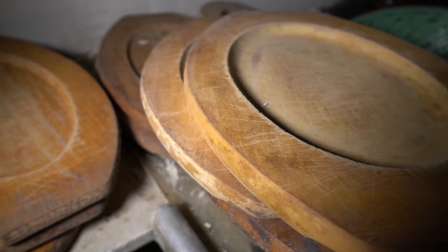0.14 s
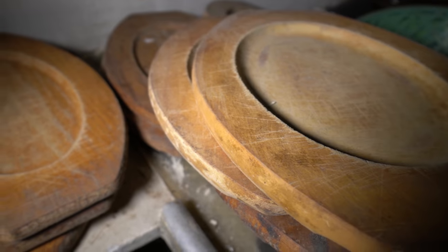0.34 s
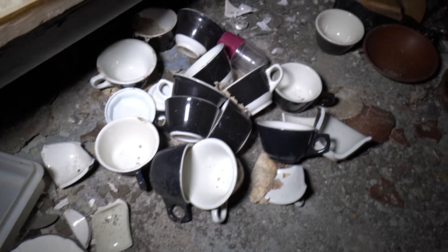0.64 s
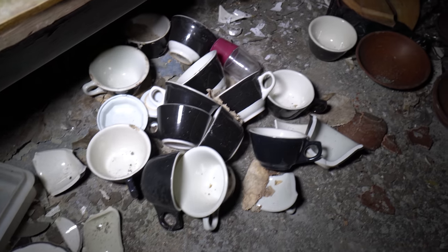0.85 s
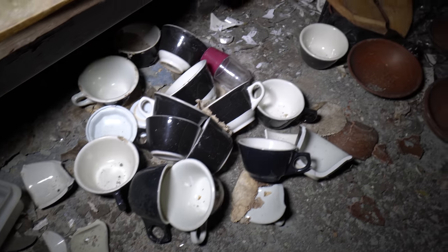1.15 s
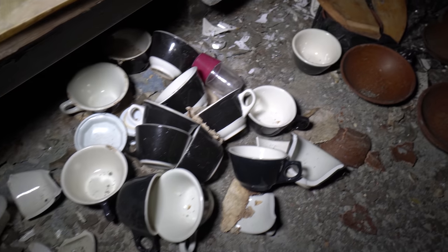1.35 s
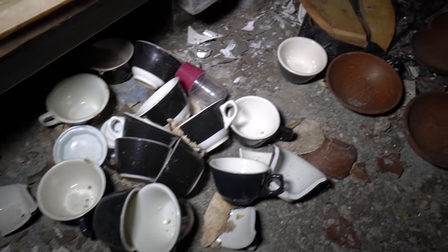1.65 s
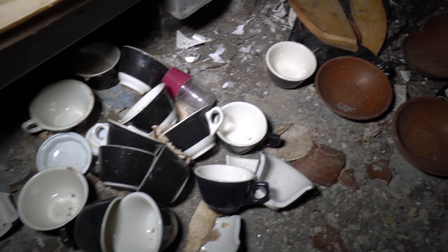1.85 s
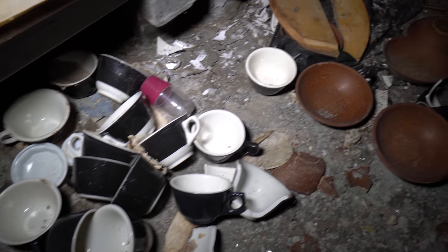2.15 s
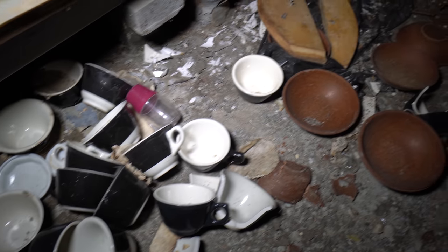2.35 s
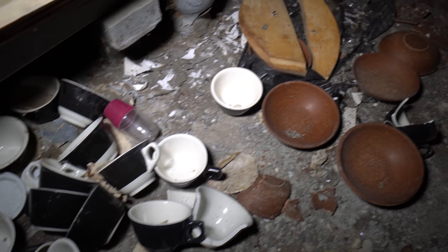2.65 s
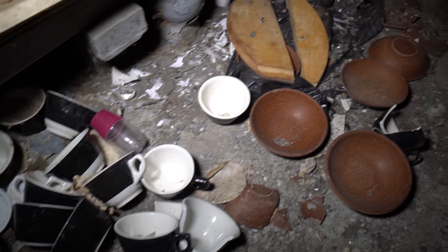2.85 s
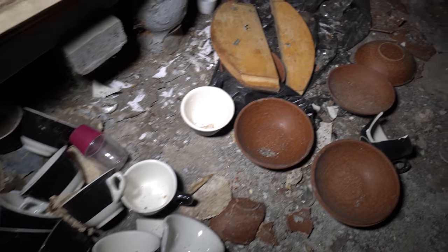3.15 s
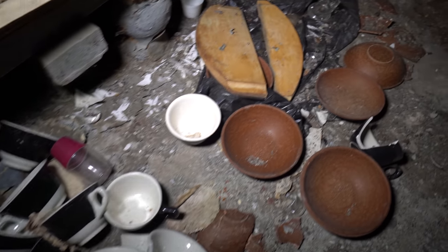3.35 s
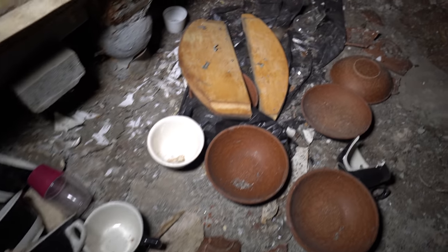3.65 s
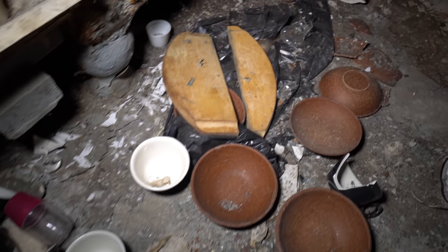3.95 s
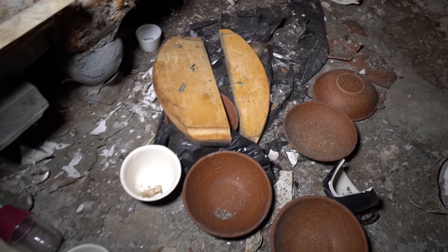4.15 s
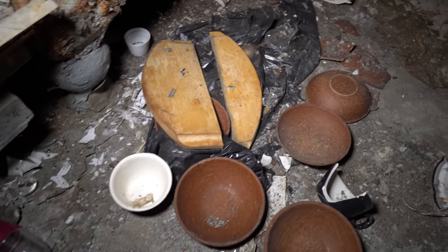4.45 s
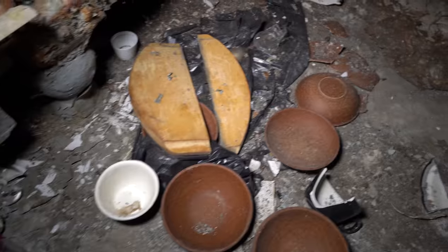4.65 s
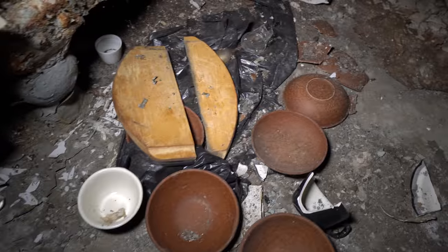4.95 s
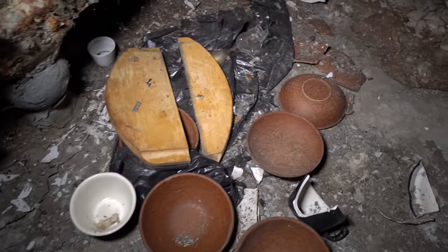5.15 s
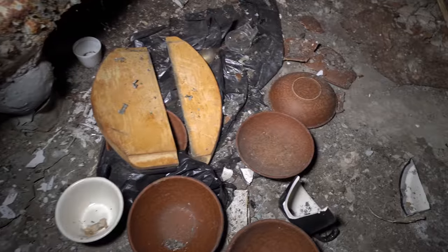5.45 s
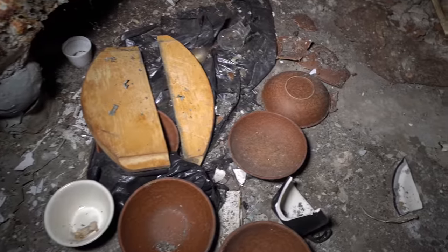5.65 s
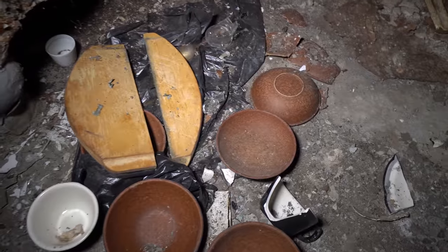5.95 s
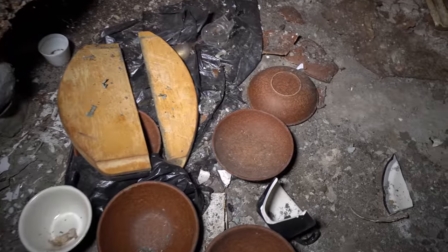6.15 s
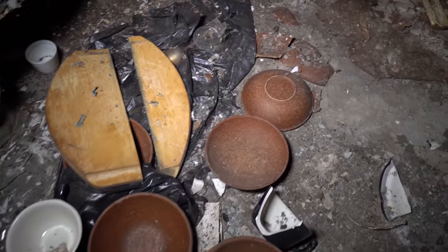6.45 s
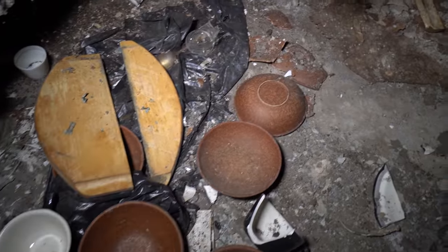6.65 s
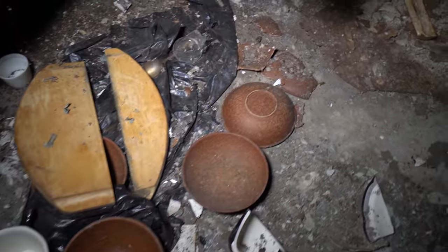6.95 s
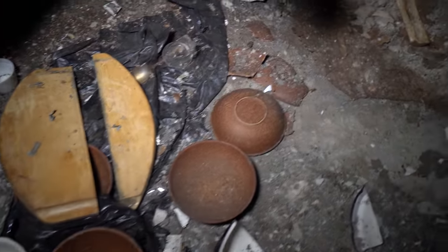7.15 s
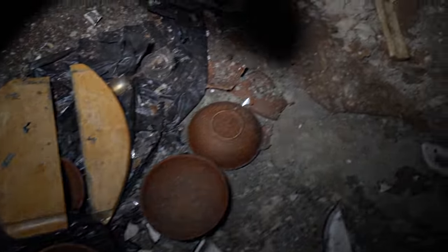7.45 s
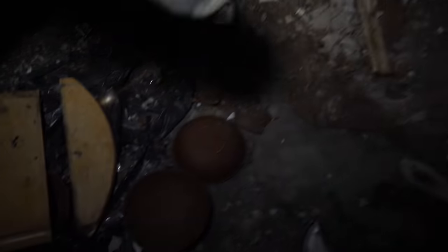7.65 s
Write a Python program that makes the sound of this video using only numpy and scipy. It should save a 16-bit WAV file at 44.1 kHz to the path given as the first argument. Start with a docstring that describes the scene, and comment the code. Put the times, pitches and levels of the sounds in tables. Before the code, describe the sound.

Shoes shift slowly over broken crockery and grit in a small bare room, shards snapping and clicking above a low handling rumble.

```python
"""Shoes shift slowly over grit and broken crockery in a small bare room, close to a hand-held microphone.
Shards crack and click: each is a sharp snap, then splinters and fizz. Soles scuff: noise and tiny grains.
A foot lands as a dull thud. Rubbed metal, a dragged shard and a faint hum are modes kept ringing by contacts.
Regular slips creak near the end. Under it all lie a deep, swelling rumble from handling and a quiet room tone."""
import sys
import numpy as np
from scipy import signal
from scipy.fft import rfft, irfft, next_fast_len
from scipy.io import wavfile
from scipy.ndimage import uniform_filter1d

SR = 44100
rng = np.random.default_rng(int(sys.argv[2]) if len(sys.argv) > 2 else 0)


def store_wav(level_fs):
    """Save 16-bit WAV to argv[1]."""
    pcm = np.round(np.clip(np.atleast_2d(level_fs), -1, 1) * 32767)
    wavfile.write(sys.argv[1], SR, pcm.T.astype(np.int16))


N = 344421  # length in samples


def amp(db):
    """Turns decibels into a gain."""
    return 10 ** (np.asarray(db) / 20)


def evened(x):
    """Scales a signal to an rms of 1."""
    return x / np.sqrt(np.mean(x ** 2) + 1e-20)


def smoothed_twice(x, size):
    """Turns noise into a slow wander with an rms of 1, by averaging neighbours twice."""
    return evened(uniform_filter1d(uniform_filter1d(x, size=size), size=size))


def read(points, hz):
    """Reads a table of values over pitch, along a log-frequency axis."""
    f, value = np.transpose(points)
    return np.interp(np.log(hz + 1), np.log(f + 1), value)


def curves(rows):
    """Draws each column of a timed table as a curve, sample by sample."""
    s, *columns = np.transpose(rows)
    return [np.interp(np.arange(N) / SR, s, column) for column in columns]


def inside(rows):
    """Is 1 while a timed table lasts and 0 elsewhere, with soft ends."""
    t = np.arange(N) / SR
    lasts = (t >= rows[0][0]) & (t <= rows[-1][0])
    return uniform_filter1d(1. * lasts, size=300)


def colour(x, db):
    """Filters without any pre-echo: the phase follows from the log gain (minimum phase)."""
    cepstrum = irfft(np.log(amp(np.maximum(db, -100))))
    half = cepstrum.shape[-1] // 2
    # fold the backward half of the cepstrum onto the forward half
    folded = [cepstrum[..., :1], 2 * cepstrum[..., 1:half], 0 * cepstrum[..., half:]]
    response = irfft(np.exp(rfft(np.concatenate(folded, -1))))
    return signal.oaconvolve(x, response, axes=-1)[..., :x.shape[-1]]


def shaped(points):
    """Makes steady noise of a given spectrum, with an rms of 1."""
    gain = amp(read(points, np.fft.rfftfreq(N, 1 / SR)))
    return evened(irfft(rfft(rng.standard_normal(N)) * gain, N))


def ring(x, hz, width):
    """Rings one mode, width in Hz, with about unit gain at its centre."""
    pole = np.exp((2j * np.pi * hz - np.pi * width) / SR)
    return 2 * signal.lfilter([1 - abs(pole)], [1, -pole], x).real


def add(mix, s, sound):
    """Mixes a sound in at a time in seconds."""
    part = mix[round(s * SR):][:len(sound)]
    part += sound[:len(part)]


def rumble():
    """Handling shakes the microphone: lumpy noise, flattened in level, then swelling at random."""
    # Base level of the shake. Each row: time in seconds, level in dB before the random swell.
    shake_level = [(0.0, -29), (0.08, -29), (1.0, -25.5), (1.02, -39.5), (1.32, -19), (1.85, -40.5),
                   (1.98, -27.5), (2.17, -40), (2.26, -25), (2.41, -38.5), (2.48, -28), (3.04, -35),
                   (3.28, -21), (5.02, -30), (5.15, -36), (5.2, -28), (5.79, -24), (5.85, -40.5),
                   (6.24, -17.5), (6.33, -31.5), (6.79, -26), (6.81, -33), (7.39, -22), (7.81, -24)]
    # Colour of the shake. Each row: frequency in Hz, relative level in dB per Hz.
    shake_colour = [(2, -22), (6, -9), (15, -8), (21, 0), (25, -10), (30, -16), (37, -16), (42, -26),
                    (50, -50), (80, -90)]
    swell_db, swell_s = 3, .06
    shake = signal.hilbert(shaped(shake_colour), next_fast_len(N))[:N]
    # dividing by its own envelope makes the shake steadier
    steady = evened((shake / (abs(shake) + 0.36)).real)
    swell = smoothed_twice(rng.standard_normal(N), round(swell_s * SR))
    moving = amp(curves(shake_level)[0] + swell_db * swell) * steady
    low_pass = signal.butter(7, 41, fs=SR, output="sos")
    return signal.sosfiltfilt(low_pass, moving)


def unshared_bass():
    """Steady noise, mostly bass, that the two channels will take with opposite signs."""
    # Each row: frequency in Hz, relative level in dB per Hz.
    bass_colour = [(2, -8), (7, 0), (15, -6), (21, -2), (27, -16), (36, -19), (45, -33), (70, -33),
                   (110, -41), (140, -46), (200, -57), (400, -68), (800, -78), (2500, -92), (16000, -93)]
    return amp(-44.5) * shaped(bass_colour)


def room_tone():
    """The quiet steady noise of the room, given its colour by a spectrum."""
    # Each row: frequency in Hz, relative level in dB per Hz.
    tone_colour = [(35, -28), (47, 4), (60, -2), (90, -12), (150, -11.5), (260, -16), (420, -16.5),
                   (600, -16.5), (1500, -19), (4300, -23.5), (7000, -33.5), (16000, -42)]
    return amp(-59) * shaped(tone_colour)


def slides():
    """Gains of slide, hiss and weight as a sole slides on grit: each slide rises, holds and dies away."""
    # Each row: time in seconds when the slide reaches full level, after its rise, held time in seconds,
    # level in dB (scuff() later lowers all by 3.5 dB), treble hiss in dB, low weight in dB;
    # hiss and weight are relative to the slide.
    slide_rows = [(0, .03, -47, -12, 3.5), (.2, .04, -52, 3.5, -10.5), (.3, .14, -59, -3, -10),
                  (.56, .04, -51, 2.5, -3.5), (.75, .21, -53, -2, -2), (1.0, 0.12, -51.5, -6, -6),
                  (1.14, .05, -44, -15, -13), (1.26, .15, -51.5, -8, -9), (1.45, .09, -50, -5, -6),
                  (1.88, .1, -39, -23, 0), (2.12, .08, -59, -16, 3), (2.32, .04, -49, -14, -15),
                  (2.44, .2, -51, -15, -10), (2.7, .23, -47, -8, -4), (3.02, .09, -47.5, -12, -3),
                  (3.19, .18, -41.5, -10, -14), (3.4, .07, -48, -7, -14), (3.49, .03, -39, -7, -14),
                  (3.62, .26, -49, -8, -7), (4.0, .1, -52, -17, -13), (4.48, .05, -44, -20, -7),
                  (4.6, 0.17, -55, -5, -7.5), (4.88, 0.046, -62, -3, -2), (4.949, 0.13, -54.5, -8, -1.5),
                  (5.23, .11, -52.5, -8.5, -6.5), (5.42, .12, -56.5, -8.5, -3), (5.59, .05, -50, -7.5, 4.5),
                  (5.75, .26, -56, -11.5, -5.5), (6.04, .03, -51, -11, -6), (6.131, .09, -57.5, -20, -1),
                  (6.33, .1, -53, -10, -0.5), (6.499, 0.18, -48, -7.5, -4), (6.7, .19, -42, -11, -3),
                  (6.929, .25, -48.5, -9, -1), (7.24, .07, -57, -5, -3), (7.36, 0.018, -45, -21, -7),
                  (7.45, .13, -55, -8, 3), (7.65, .02, -50, -14, -6), (7.78, .03, -54, -5, 2)]
    rise_db_per_s, fall_db_per_s = 240, 150
    s, held, db, hiss_db, weight_db = np.transpose(slide_rows)[:, :, None]
    t = np.arange(0, N + 64, 64) / SR  # a coarse clock is enough
    before, after = np.maximum(s - t, 0), np.maximum(t - s - held, 0)
    shape_db = db - rise_db_per_s * before - fall_db_per_s * after
    gains = []
    for extra_db in (0, hiss_db, weight_db):
        total = np.sqrt((amp(shape_db + extra_db) ** 2).sum(0))
        gains.append(np.interp(np.arange(N) / SR, t, total))
    return gains


def scuff(grains_per_s=900, spread_db=3.0, grain_share=0.42, flicker_db=3.0, level_db=-3.5):
    """A sole rubs on grit: flickering noise and many small grains, in three bands with their own gains."""
    # Colour of the grit. Each row: frequency in Hz, relative level in dB per Hz.
    grit_colour = [(88, -38.5), (150, -11.5), (368, -8.5), (745, -7), (854, -4), (1080, -4.5), (1600, 2.5),
                   (3350, -4.5), (4320, -4.5), (6260, -20), (16000, -36.5)]
    slide, hiss, weight = slides()
    hits = rng.random(N) < grains_per_s / SR
    sizes = amp(spread_db * np.minimum(rng.exponential(1, N), 4))
    grains = hits * sizes * rng.choice([-1., 1.], N)
    flicker = smoothed_twice(rng.standard_normal(N), 500)
    noise = rng.standard_normal(N) * amp(flicker_db * flicker)
    drive = grain_share * evened(grains) + np.sqrt(1 - grain_share ** 2) * noise
    grit = colour(drive, read(grit_colour, np.fft.rfftfreq(2048, 1 / SR)))
    low = signal.sosfilt(signal.butter(3, [150, 850], "band", fs=SR, output="sos"), grit)
    mid = signal.sosfilt(signal.butter(3, [850, 6500], "band", fs=SR, output="sos"), grit)
    high = signal.sosfilt(signal.butter(4, 6500, "high", fs=SR, output="sos"), grit)
    return amp(level_db) * (slide * evened(mid) + hiss * evened(high) + weight * evened(low))


def rubbed_mode(hz, t60, size, per_s=1500):
    """Small uneven contacts keep one mode of a hard thing ringing; the changing grip bends its pitch."""
    bend = .0012  # typical wander, as a share of the pitch
    n = size + 3000  # the mode is already swinging when it is heard
    contacts = (rng.random(n) < per_s / SR) * rng.standard_normal(n) * np.exp(2j * np.pi * rng.random(n))
    wide, narrow = np.exp(-np.pi * np.array([8, 2.2]) / t60 / SR)  # two poles smooth the swing
    swing = signal.lfilter([1], np.poly([wide, narrow]), contacts)
    grip = smoothed_twice(rng.standard_normal(n), 2500)
    turns = np.cumsum(hz * (1 + bend * grip)) / SR
    return evened((swing * np.exp(2j * np.pi * turns)).real[-size:])


def singing(modes_hz, spells, t60):
    """Rubbing keeps each mode ringing for some short spells; t60 in seconds sets how slowly it swings."""
    out = np.zeros(N)
    for hz, of_mode in zip(modes_hz, spells):
        for s, length, db in of_mode:
            force = amp(db) * signal.windows.tukey(round(length * SR) + 2, .6)
            add(out, s, force * rubbed_mode(hz, t60, size=len(force)))
    return out


def rubbed_metal():
    """A small metal piece sings on several modes as it is rubbed."""
    # The pitch of each mode in Hz.
    metal_hz = [3400, 3455, 5240, 5330, 7960, 10600, 12550, 15300]
    # One list of spells for each mode. Each spell: start in seconds, length in seconds, level in dB.
    metal_spells = [
        [(1.3, 0.037, -54), (4.528, 0.044, -46.5)],
        [(0, 0.063, -55), (.78, 0.057, -57), (1.25, .07, -54), (1.3, 0.064, -39.5), (1.335, 0.079, -42.5),
         (1.39, 0.12, -49), (4.525, 0.11, -46), (4.61, 0.1, -54)],
        [(1.3, 0.03, -45), (1.39, .05, -53), (4.535, 0.087, -49)],
        [(0, 0.05, -68), (1.29, 0.12, -45.5), (4.54, 0.07, -51), (4.6, 0.07, -57)],
        [(0, .04, -68), (1.305, 0.071, -52), (1.365, 0.052, -66), (4.545, .065, -69)],
        [(1.3, 0.076, -65), (4.55, .04, -78)],
        [(.81, 0.074, -72), (1.31, .06, -74)],
        [(.81, .09, -74), (1.3, .07, -74)],
    ]
    return singing(metal_hz, metal_spells, t60=0.06)


def thuds(rise_s=0.0026):
    """The weight of a foot: a fading push of noise sets off a dull, rough low ring."""
    # Each row: start in seconds, peak level in dB, pitch in Hz, time in seconds for the push to fall 60 dB.
    thud_rows = [(0.005, -37.5, 474, 0.11), (1.874, -37, 200, 0.12), (1.9, -47, 330, .12),
                 (2.119, -49, 140, 0.11), (3.223, -34, 151, 0.078), (3.288, -42, 420, 0.12),
                 (4.505, -51.5, 252, .08), (5.558, -46, 296, .06), (5.6, -36, 203, 0.026),
                 (6.272, -50, 303, 0.042), (6.502, -41.5, 280, 0.065), (6.751, -52, 178, 0.12),
                 (7.227, -48, 400, 0.069), (7.354, -41, 254, 0.091), (7.368, -43, 121, 0.057),
                 (7.77, -64, 300, .06)]
    out, t = np.zeros(N), np.arange(8192) / SR
    for s, db, hz, t60 in thud_rows:
        push = rng.standard_normal(len(t)) * (1 - np.exp(-t / rise_s)) * amp(-60 * t / t60)
        low = ring(ring(push, hz, .75 * hz), hz, .75 * hz)
        add(out, s, amp(db) * low / abs(low).max())
    return out


def chips(count=26):
    """Faint cracks under a moving sole, drawn at random: more and louder where it slides hard."""
    over_slide_db, middle_hz = 5, 1900
    colour_db = [-14, -1, -16, -22]  # body, bite, treble and fizz, as for the cracks
    scatter_db, scatter_octaves = 4, .3
    when, pitch, size, *colours = rng.standard_normal((count, 7)).T
    slide = slides()[0]
    # equal steps along this running share fall closer together in loud slides
    share = np.cumsum(np.sqrt(slide)) / np.sqrt(slide).sum()
    place = (np.arange(count) + .5 + .3 * when) / count
    at = np.searchsorted(share, np.clip(place, 0, .999))
    db = 20 * np.log10(slide[at]) + over_slide_db + scatter_db * size
    hz = middle_hz * 2 ** (scatter_octaves * pitch)
    return np.c_[at / SR, db, hz, colour_db + scatter_db * np.transpose(colours)]


def cracks(splinter_db=-9):
    """A shard snaps, splinters for some ms and fizzes out; each has its own pitch and colour."""
    # The clearest cracks. Each row: start in seconds, level of the loudest 3 ms in dB, ring pitch in Hz,
    # body under 1 kHz in dB, bite near 4 kHz in dB, treble in dB, fizz in dB; the last four are relative.
    crack_rows = [(.1792, -33.5, 2200, -15, 2, -18, -25), (.5614, -37, 2350, -7, -2, -14, -23),
                  (.6323, -38.5, 2340, -5, 0, -36, -25), (.8569, -33, 2360, -13, -4, -23, -25),
                  (.912, -30, 2350, -19, -4, -24, -21), (.9459, -37, 900, -10, 0, -18, -21),
                  (1.0639, -39.5, 2530, -8, 11, -4, -21), (1.2015, -22.5, 1465, -8, -3, -15, -24),
                  (1.2262, -21, 1520, -9, -10, -21, -31), (1.413, -42.5, 960, -8, -18, -37.5, -8),
                  (1.4703, -29, 1530, -11, -1, -16, -25), (1.5317, -31, 870, -12, -11, -15, -24),
                  (1.7104, -48, 1510, -16, -24, -26, -30), (1.75, -48, 1560, -18, -6, -22, -17),
                  (1.8664, -35.5, 2020, 0, -4, -26, -21), (1.894, -36, 2000, 8, -6, -18, -5),
                  (1.912, -38, 2500, -10, -3, -6, -8), (1.9801, -32, 1500, -9, -12, -24, -32),
                  (1.9987, -33.5, 2070, -19, -4, -11, -23), (2.0488, -37, 1800, -24, -9, -19, -25),
                  (2.19, -48, 2000, -16, -3, -12, -25), (2.273, -45, 1590, -15, -12, -7, -25),
                  (2.29, -44, 1600, -14, -27, -20, -21), (2.3168, -33.5, 2170, -17, 2, -12, -20),
                  (2.3589, -39, 1600, -14, -5, -17, -20), (2.3656, -37, 1630, -22, -7, -25, -25),
                  (2.3801, -35.5, 1610, -15, -10, -15, -19), (2.4095, -39.5, 2130, -17, -21, -26, -26),
                  (2.4187, -38, 1610, -22, -19, -26, -24), (2.4314, -36.5, 2070, -20, 2, -11, -17),
                  (2.4594, -39, 1600, -14, -12, -18, -22), (2.4799, -33, 1400, -6.5, -9, -32, -18),
                  (2.5076, -29, 1480, -6, -8.5, -25, -20), (2.5344, -37.5, 2120, -26, 0, -10, -19),
                  (2.5667, -37, 1590, -14, -12, -22, -19), (2.5937, -34.5, 1630, -10, -13, -27, -22),
                  (2.6274, -25, 1680, -27, -2.5, -30, -20), (2.6932, -17.5, 1550, -19, -3, -21, -15),
                  (2.7208, -35, 1790, -8, -14, -19, -13), (2.7338, -25.5, 2220, -11, 2, -15, -9),
                  (2.7924, -39, 1420, -16, -7, -18, -21), (2.802, -28.5, 2380, -27, -1, -23, -24),
                  (2.8432, -26.5, 1020, -5, 6.5, 4, -25), (2.8821, -35, 2240, -18, 7, -19, -19),
                  (2.8893, -24, 2250, -24, -7, -30, -24), (2.9146, -14.5, 1620, -21, -6.5, -20, -25),
                  (2.9426, -33.5, 1970, -19, -17, -13, -16), (3.0072, -31, 1070, -15, -1, -10, -20),
                  (3.0194, -27, 1060, -17, -4, -15, -5), (3.0299, -23.5, 1680, -9, -14, -25, -27),
                  (3.08, -27, 1094, -9.5, 8, -17, -15), (3.1525, -31, 1520, -4, -1, -6, -19),
                  (3.1927, -26, 3180, -14, 5.5, -7, -26), (3.2265, -28, 3200, 1, 5, -13, -18),
                  (3.238, -28, 3200, -5, 0, -11, -14), (3.2749, -29, 1500, 1, -14, -20, -8),
                  (3.2807, -20.5, 1360, -1, -26, -28, -24), (3.2946, -16, 1340, -10, -16, -18, -22),
                  (3.306, -22, 1380, -6, -8, -21, -17), (3.3158, -28, 3070, -24, 6, -16, -13),
                  (3.3524, -25.5, 3200, -34, 3, -4, -17), (3.4045, -37.5, 1670, -18, -16, 3, -17),
                  (3.424, -37, 2610, -10, -5, -12, -18), (3.4357, -31, 2540, -17, -8, -3, -13),
                  (3.4493, -30.5, 1810, -5, -3, -14, -18), (3.4639, -36, 1870, -12, 7, -18, -21),
                  (3.4829, -18.5, 2410, -6.5, 1.5, -9, -18), (3.5395, -37, 1770, -17, -15, -21, -21),
                  (3.5627, -36, 1780, -21, 5, -9, -16), (3.5717, -34.5, 1940, -20, -5, -14, -18),
                  (3.6009, -35, 1290, -10, -14, 1, -18), (3.6307, -19.5, 1880, -13, -7.5, -7, -18),
                  (3.6424, -20, 1280, -4, -1, -7, -27), (3.6908, -31, 1720, -10, -20, -9, -24),
                  (3.7246, -30, 1280, -6, -26, -11, -20), (3.7316, -29.5, 1660, -8, 10, -9, -23),
                  (3.7643, -30.5, 1810, -18, -6, -26, -20), (3.7871, -34.5, 1790, -14, -11, -30, -24),
                  (3.8039, -31, 1820, -14, -5, -16, -21), (3.8218, -28, 1580, -8, 8, -4, -16),
                  (3.8979, -26, 1680, -33, -6, -32, -29), (3.9119, -25, 1620, -21, -4.5, -26, -26),
                  (3.9249, -38, 1920, -15, 1, -24, -21), (3.9444, -39, 1960, -16, -7, -27, -26),
                  (3.9891, -19.5, 1920, -45, -11, -21, -17), (4.0852, -32.5, 1940, -7, 1, -7, -22),
                  (4.1337, -41, 2000, -14, -20, -24, -29), (4.3652, -47.5, 1810, -5, -5, -22, -18),
                  (4.4355, -29, 1900, -12, -2, -12, -22), (4.4784, -34, 1960, -22, 4, -19, -18),
                  (4.4836, -30, 2880, -7, 2, -19, -20), (4.5143, -26, 1240, -16, -14, -28, -33),
                  (4.545, -38.5, 2000, -12, 5, -18, -18), (4.6118, -30.5, 1190, -15, -8, -34, -24),
                  (4.6398, -34.5, 1670, -8, 5, -9, -22), (4.701, -29.5, 1570, -7, 1, -10, -29),
                  (4.7238, -36, 1630, -22, -4, -8, -21), (4.8612, -48.5, 920, -15, 8, 0, -20),
                  (5.1446, -42, 1410, -17, -10, -28, -27), (5.185, -38.5, 1910, -20, 8.5, 0, -17),
                  (5.2333, -34, 3020, -34, -2.5, -14, -18), (5.298, -44, 2170, -14, -5, -13, -12),
                  (5.3277, -35.5, 2060, -10, -2, -13, -26), (5.5594, -42.5, 1170, -1, -28, -18, -14),
                  (5.637, -36, 1690, -1, -2, -15, -12), (6.1229, -34, 1890, -32, -3, -12, -17),
                  (6.2235, -41.5, 2000, -17, 3, -19, -17), (6.273, -43, 1030, 4, 3, -6, -18),
                  (6.2966, -32, 1860, -26, -10, -19, -30), (6.3059, -38.5, 2890, -31.5, 3, -8, -28),
                  (6.3758, -35.5, 1540, -16, 3, -5, -21), (6.3947, -27, 3100, -12, 4, -8, -25),
                  (6.4052, -35, 1620, -13, -1, -11, -21), (6.441, -36.5, 3120, -24, 1, 1, -24),
                  (6.5016, -18, 2400, -10, 6, 1, -22), (6.5127, -20.5, 2540, -17, 9, -13, -27),
                  (6.5637, -29.5, 2500, -21, -2, -19, -20), (6.5909, -39, 2650, -15, 15, -14, -19),
                  (6.6683, -36, 1610, -7, -7, -19, -18), (6.6985, -32, 1890, -13, 0, -21, -25),
                  (6.7054, -30, 3150, -39, 10, -8, -26), (6.7131, -22.5, 3030, -23, -5, 0, -24),
                  (6.719, -24, 3110, -12, 1, -9, -21), (6.7352, -29.5, 1560, -15, 4, -12, -32),
                  (6.815, -38, 3500, -20, 6, -6, -22), (6.841, -36, 3500, -20, 6, -6, -22),
                  (6.9056, -34, 1590, -14, -14, -18, -19), (6.9179, -27.5, 1600, -16, -13, -15, -13.5),
                  (6.939, -32, 1520, -4, -13, -26, -23), (6.9951, -30, 2014, -6, -5, -13, -22),
                  (7.0091, -31, 1420, -15, -15, -24, -28), (7.0816, -31, 1930, -17, 2, -20, -19),
                  (7.0934, -22, 1608, -27, 2.5, -20, -18), (7.1273, -31.5, 1590, -13, 9, -11, -23),
                  (7.1915, -39, 1610, -9, -12, -21, -19), (7.2158, -34.5, 950, -6, 9, 10, -26),
                  (7.2296, -13.5, 1480, -11, -3, -17, -30), (7.2461, -33, 2720, -5, 0, -10, -21),
                  (7.2805, -25, 1520, -17, -3, -1, -33), (7.2987, -35, 1550, -23, -6, 0, -31),
                  (7.3501, -34, 1750, -2, 2, -24, -8), (7.3555, -21.5, 1580, -5, -8, -28, -28),
                  (7.4363, -17, 1505, -25, -4, -6, -34), (7.6006, -45, 1600, -31, -30, -17, -12),
                  (7.7369, -40.5, 1600, -10, -13, -16, -24), (7.7687, -34, 1570, -22, -6.5, -22, -6)]
    # Top treble under the treble setting. Each row: time in seconds, level in dB.
    top_under_treble = [(0, -8), (1.5, -10), (2.5, -8), (3.1, -9), (3.3, -4), (3.7, -4), (3.85, -8),
                        (4.7, -8), (5.3, -8), (6.3, -11), (6.6, -19), (7.2, -21), (7.81, -8)]
    lumps_db = 3.5  # unevenness of the fizz
    snap_s = 3.5e-5  # bluntness of the snap
    ring_db, ring_db_per_octave, ring_octaves = 5.5, -3.5, .16  # height at 2 kHz, tilt, width
    s, db, centre, body, bite, treble, fizz_db = np.vstack([crack_rows, chips()]).T[:, :, None]
    top = treble + np.interp(s, *np.transpose(top_under_treble))
    # a fizzier crack lasts longer, a louder one is shorter
    t60 = np.maximum(.06 + .0011 * fizz_db - .0005 * db, .01)
    t, hz = np.arange(4096) / SR, np.fft.rfftfreq(1024, 1 / SR)
    draw = rng.standard_normal((len(s), 3, len(t)))
    splinters = (abs(draw[:, 0]) > 2.6) * draw[:, 1] * amp(splinter_db - 60 * t / (.5 * t60 + 0.0017))
    # the fizz comes in lumps of about a millisecond
    lumps = lumps_db * evened(uniform_filter1d(draw[:, 1], size=60))
    fizz = draw[:, 2] * amp(lumps + fizz_db - 60 * t / t60)
    # the pressure front starts with a dip, a little blunt, so the treble is left to splinters and fizz
    snap = np.exp(-t / snap_s) / (1 + snap_s * SR) * 1.5
    drive = splinters + fizz - snap
    octave = np.log2(hz + 1)
    zones = np.log2([150, 650, 1200, 2400, 4300, 7700, 12700, 22050])  # zone centres, Hz inside the log
    tents = np.array([np.interp(octave, zones, row) for row in np.eye(len(zones))])
    # level per Hz: a narrow zone holds more per Hz than a wide one
    low_db = [body - 14, body + 6, 0 * db, 0 * db - 1.5]
    high_db = [bite - 1.5, treble - 3, top - 5, top - 14]
    zone_db = np.hstack(low_db + high_db)
    # lower shards ring more clearly
    height = ring_db + ring_db_per_octave * np.log2(centre / 2000)
    bump = height * np.exp(-.5 * ((octave - np.log2(centre)) / ring_octaves) ** 2)
    sound = colour(drive, zone_db @ tents + bump)
    peak = np.sqrt(uniform_filter1d(sound[:, :300] ** 2, size=130).max(1, keepdims=True))
    out = np.zeros(N)
    for at, one in zip(s[:, 0], amp(db) * sound / peak):
        add(out, at, one)
    return out


def dragged_shard():
    """A dragged shard squeals briefly on many modes, most of them overlapping."""
    # The pitch of each mode in Hz.
    shard_hz = [2420, 2960, 3180, 4345, 4970, 6142, 8300, 8520, 9400, 10860, 11540, 12450]
    # One list of spells for each mode. Each spell: start in seconds, length in seconds, level in dB.
    shard_spells = [
        [(1.917, 0.056, -42.5)],
        [(1.88, 0.04, -40)],
        [(1.923, 0.046, -34)],
        [(1.908, 0.027, -42), (1.95, 0.064, -42), (1.99, 0.09, -53)],
        [(1.93, 0.032, -38), (1.96, 0.023, -48)],
        [(1.79, 0.037, -77), (1.91, 0.051, -44)],
        [(1.853, 0.1, -59)],
        [(1.885, 0.092, -61)],
        [(1.917, .055, -70)],
        [(1.865, 0.073, -68)],
        [(1.8, 0.041, -72), (1.908, 0.072, -58)],
        [(1.878, .085, -66)],
    ]
    return singing(shard_hz, shard_spells, t60=0.032)


def hum():
    """A faint hum on one mode comes and goes, made like the rubbed modes."""
    spells = [(4.98, 0.38, -70), (5.78, 0.35, -63.5)]  # start in seconds, length in seconds, level in dB
    return singing([369], [spells], t60=0.063)


def creak(jitter=.13, uneven_db=3.5, level_db=5):
    """Stick-slip: nearly regular slips of uneven strength knock a hollow body."""
    # Each row: time in seconds, level in dB before level_db is added, slips per second before the jitter.
    slip_rows = [(6.74, -53, 120), (6.79, -44, 102), (6.83, -41.5, 110), (6.88, -46, 140),
                 (6.91, -39.5, 110), (6.95, -56, 98), (6.98, -44, 89), (7.0, -57, 120), (7.06, -53, 150)]
    # Modes of the body. Each row: pitch in Hz, width in Hz, strength in dB before dividing by the width.
    body_modes = [(510, 130, -3.5), (985, 100, 3.5), (1620, 130, 5.5), (2250, 360, 7)]
    db, rate = curves(slip_rows)
    wander = evened(uniform_filter1d(rng.standard_normal(N), size=400))
    turns = np.cumsum(rate * (1 + jitter * wander)) / SR
    # one slip each time the count passes a whole number
    slips = np.diff(np.floor(turns), prepend=0) * amp(uneven_db * rng.standard_normal(N))
    body = np.zeros(N)
    for k, (hz, width, strength_db) in enumerate(body_modes):
        body += (-1) ** k * amp(strength_db) * ring(slips, hz, width) / width
    return inside(slip_rows) * amp(db + level_db) * evened(body)


def early_echoes(hits):
    """The floor and near walls throw back a few quick, fainter copies."""
    # Each row: delay in seconds, level in dB.
    echo_rows = [(.0015, -37), (.0022, -29), (.0037, -38.5), (.0068, -18.5), (0.01, -22)]
    return sum(amp(db) * np.roll(hits, round(s * SR)) for s, db in echo_rows)


def room(x):
    """Sparse reflections of random sign, each band dying at its own speed."""
    # Each row: frequency in Hz, time in seconds for the echo to fall 60 dB.
    decay_rows = [(200, 0.33), (1000, 0.16), (4000, 0.18), (12000, 0.11)]
    taps = np.zeros(SR // 2)
    at = np.arange(160, len(taps) - 20, 20)
    taps[at + rng.integers(0, 20, len(at))] = rng.choice([-1., 1.], len(at))
    hz, t, bands = signal.stft(taps, SR, nperseg=256)
    decay = amp(-60 * t / read(decay_rows, hz)[:, None])
    tail = signal.istft(bands * decay, SR, nperseg=256)[1]
    return signal.oaconvolve(x, tail / np.linalg.norm(tail))[:N]


def scene():
    """Mixes all layers nearly mono: mainly the bass differs a little between left and right."""
    hits = cracks() + thuds() + creak()
    near = hits + early_echoes(hits)
    rubbed = rubbed_metal() + dragged_shard()
    feet = near + amp(-9.5) * room(hits) + scuff() + rubbed
    shake = rumble()
    steady = shake + room_tone() + hum()
    # the left takes slightly more of the shake
    side = unshared_bass() + amp(-31) * shake
    return np.array([feet + steady + side, feet + steady - side])


def record(dry):
    """Limits the band: a steep low-pass removes what lies above about 16 kHz."""
    low_pass = signal.firwin(1023, 16000, window=("kaiser", 9), fs=SR)
    return signal.oaconvolve(dry, low_pass[None], "same", axes=1)


dry = scene()
out = record(dry)
store_wav(out)
```